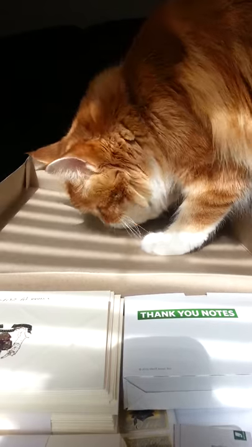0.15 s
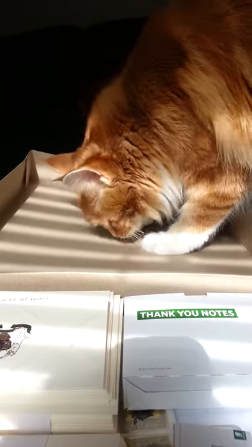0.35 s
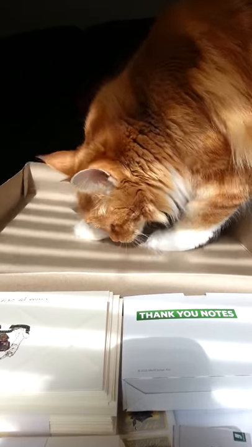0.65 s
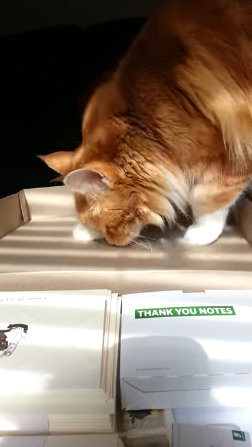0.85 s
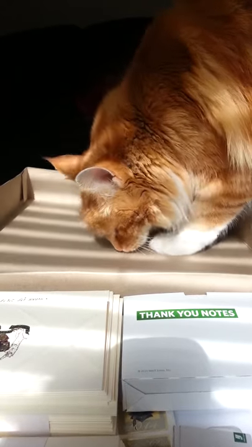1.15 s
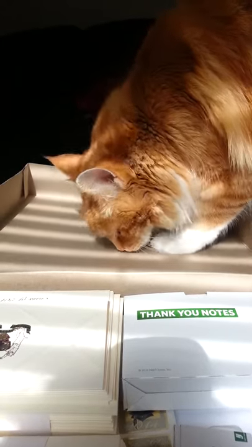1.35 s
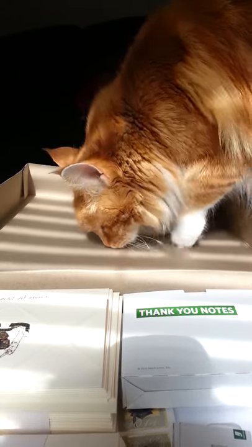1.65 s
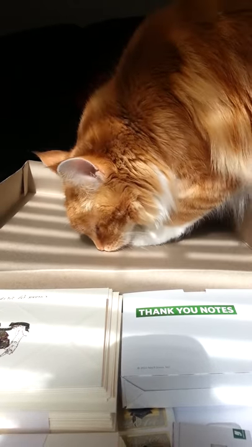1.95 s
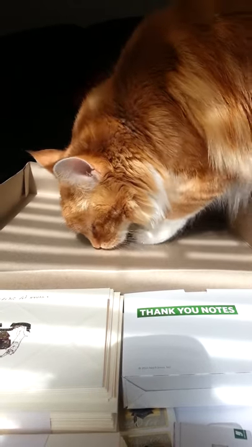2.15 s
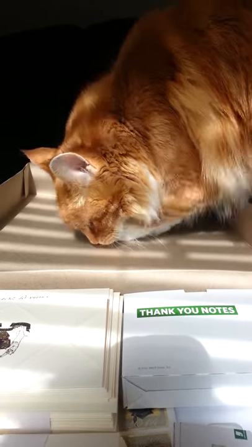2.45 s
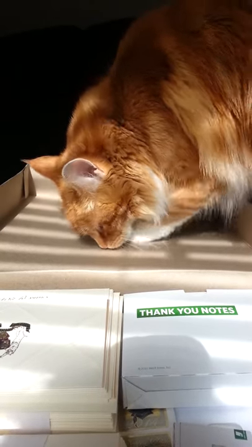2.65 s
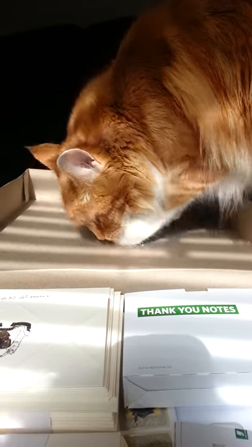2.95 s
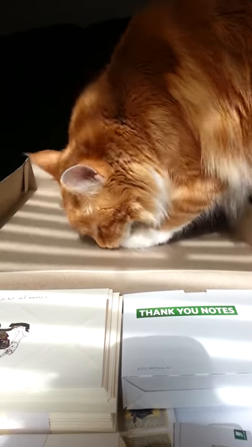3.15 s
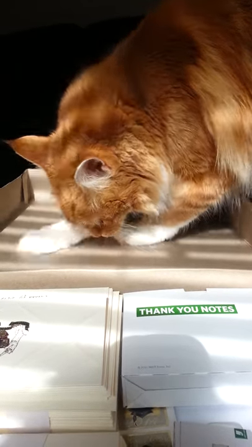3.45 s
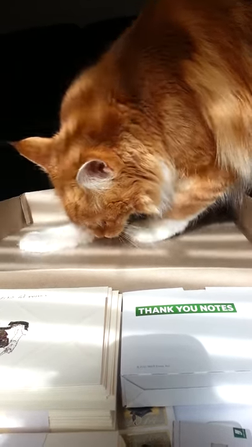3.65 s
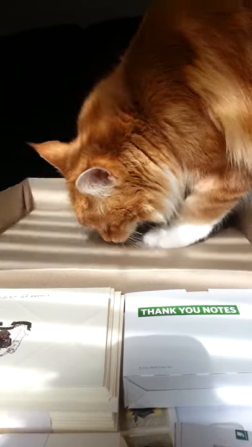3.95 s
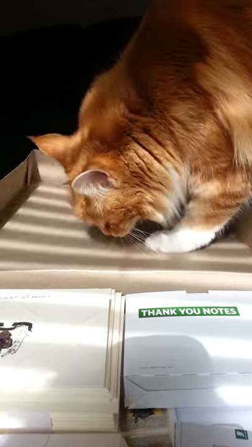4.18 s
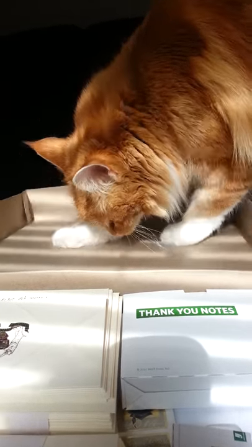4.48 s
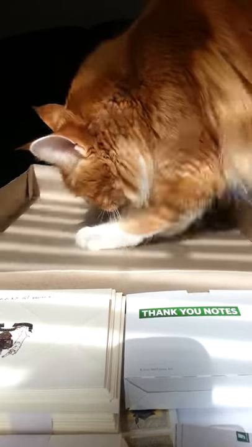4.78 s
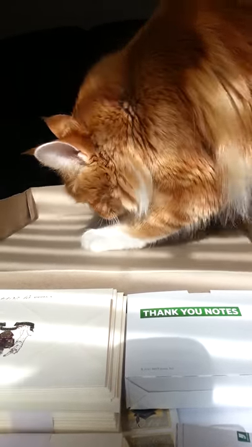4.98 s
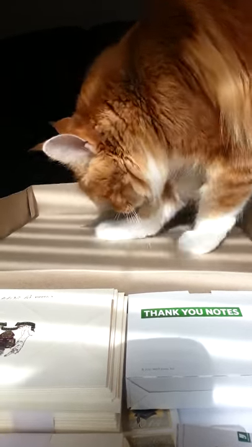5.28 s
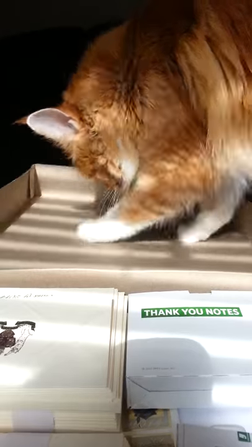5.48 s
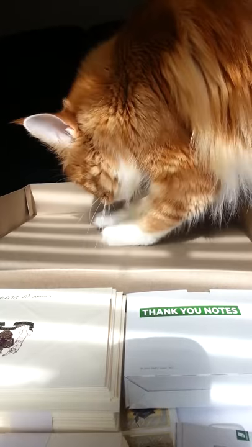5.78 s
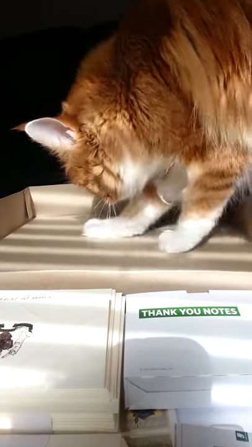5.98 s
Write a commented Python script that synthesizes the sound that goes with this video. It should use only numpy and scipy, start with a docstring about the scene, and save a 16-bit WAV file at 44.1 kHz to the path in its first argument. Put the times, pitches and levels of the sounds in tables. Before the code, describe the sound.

A cat paws at the floor of a shallow cardboard box, heard close in a quiet room with a faint, steady low hum. For the first second and a half, pads and fur make soft, dry swishes, with a small scratch and light bump near 0.7 seconds. The rubbing then thins out, and short claw rasps and ticks come at about 2 and 2.6 seconds, followed by light knocks near 2.8 and 3.5 seconds. The pawing then grows stronger, with two hollow bumps just before 4 seconds, the second the loudest. Quick scratches follow, and a claw snaps free with a sharp tick at about 4.4 seconds. Firmer sweeps continue, with another rasp and smaller bumps between 4.6 and 4.9 seconds. A sharp click and a bump land together near 5.6 seconds, and a last scraping stroke runs to about 6 seconds.

```python
"""Cat pawing in a cardboard box

Close by in a quiet room, pads and fur sweep the floor of a shallow box with a dry hiss.
Claws catch in short stick-slip rasps and snap free with sharp ticks that ring the card.
Now and then the floor gives under the cat's weight with a hollow bump. A low hum fills the room."""
import sys
import numpy as np
from scipy import signal
from scipy.fft import rfft, irfft
from scipy.io import wavfile

SR = 44100
rng = np.random.default_rng(int(sys.argv[2]) if len(sys.argv) > 2 else 0)


def int16_out(signal):
    """Quantize to a 16-bit WAV file."""
    q = np.round(np.clip(np.atleast_2d(signal).T, -1, 1) * 32767)
    wavfile.write(sys.argv[1], SR, q.astype(np.int16))


N = 269892

# Paw strokes. Each row: start in seconds, lift-off in seconds, speed as relative hiss level in dB,
# speed gain over the stroke in dB, pad pressure and claw skim as offsets to speed in dB, ring in Hz.
STROKES = [ (-0.06, 0.054, -59.5, 1, 2, -2, 3900), (0.043, 0.31, -56, -13, 2.5, 1, 4050),
           (0.437, 0.576, -55.5, 1, 1, -2, 4050), (0.58, 0.66, -67, 0.5, 8, -10, 2600),
           (0.667, 0.887, -54.5, 7.5, 4, 1, 3620), (0.972, 1.327, -55.5, -7.5, 4.5, -10, 2850),
           (1.568, 1.68, -64, -8, 4, -14, 2050), (2.05, 2.236, -67, -2, 4.5, -6, 3900),
           (2.59, 2.866, -53.5, 2.5, 2, -4, 4100), (3.03, 3.085, -59.5, 3, -1.5, -3, 3900),
           (3.147, 3.244, -53.5, 4.5, 3.5, -8, 3750), (3.454, 3.833, -56, 13, 5, -3, 3750),
           (3.826, 3.983, -43.5, -1.5, 3, -14, 3720), (3.957, 4.138, -46, 7, 2, -8, 3700),
           (4.17, 4.243, -62.5, -4, 9, -10, 2000), (4.409, 4.60, -54.5, 0, 2.5, -6, 4050),
           (4.6, 4.869, -44.5, 6.5, 2.5, -9, 2090), (5.05, 5.341, -46, -0.5, 1, -10, 2780),
           (5.364, 5.552, -43.5, 7, 2.5, -9, 3950), (5.593, 5.664, -52.5, 4, 0.5, -6, 3900),
           (5.774, 6.071, -47, -6.5, 2.5, -3.5, 2750)]
# Card panel modes. Each row: frequency in Hz, width in Hz, gain in dB.
PANEL_MODES = [(554, 390, -7), (764, 70, 0), (1173, 540, -5), (1348, 186, 6.5), (1496, 530, -2),
               (1870, 57, 2), (2018, 156, 0.5), (2270, 390, -0.5), (2584, 105, 0), (2825, 90, 3.5),
               (2950, 570, -8.5), (3520, 66, 4.5), (3560, 170, 0.5), (4350, 580, -1.5), (4570, 260, -1.5),
               (7250, 93, -12.5)]


def from_db(db):
    """Decibels to gain."""
    return 10 ** (np.asarray(db) / 20)


def rms_one(x):
    """Scale to rms 1."""
    return x / np.sqrt(np.mean(x ** 2) + 1e-20)


def seconds():
    """Time of every sample."""
    return np.arange(N) / SR


def cut(x, hz, kind, order=2):
    """Butterworth low- or high-pass."""
    return signal.sosfilt(signal.butter(order, min(hz, .45 * SR), kind, fs=SR, output="sos"), x + 1e-18)


def drift(hz):
    """Slow random wander; rms 1."""
    return rms_one(cut(rng.standard_normal(N + SR), hz, "low")[SR:])


def colour(x, spectrum):
    """Filter by a curve of (Hz, dB) points; rms 1."""
    hz, db = np.transpose(spectrum)
    bins_hz = np.maximum(np.arange(N // 2 + 1) * SR / N, 1)
    gain = from_db(np.interp(np.log(bins_hz), np.log(hz), db))
    return rms_one(irfft(rfft(x) * gain, N))


def resonate(x, hz, width_hz):
    """One resonance, peak gain 1."""
    r = np.exp(-np.pi * width_hz / SR)
    feedback = [1, -2 * r * np.cos(2 * np.pi * hz / SR), r * r]
    return signal.lfilter(np.array([1, 0, -1]) * (1 - r * r) / 2, feedback, x + 1e-18)


def body(x, modes):
    """Parallel resonances of alternating sign."""
    return sum((-1) ** k * from_db(db) * resonate(x, hz, width_hz)
               for k, (hz, width_hz, db) in enumerate(modes))


def add(out, start_s, piece):
    """Mix a piece in at start_s."""
    at = max(round(start_s * SR), 0)
    out[at:at + len(piece)] += piece[:max(N - at, 0)]


def background(hum_hz=122.1, hum_db=-63.5, drone_db=-60.5, air_db=-54.5):
    """Still room air, mains hum and a soft, wavering drone."""
    # Each row: frequency in Hz, relative noise density in dB.
    air_spectrum = [(20, -15), (32, -17), (52, -11.5), (90, -1.5), (160, -1.5), (250, -0.5), (400, -3.5),
                    (650, -8.5), (1000, -17), (1600, -13.5), (3500, -18.5), (6200, -25), (8000, -22),
                    (14500, -21)]
    hum_gain = from_db(hum_db + 2.9 * drift(hz=1.8))
    hum_phase = 2 * np.pi * hum_hz * seconds() + .5 * drift(hz=2.8)
    hum = hum_gain * rms_one(np.sin(hum_phase))
    drone = rms_one(resonate(rng.standard_normal(N + SR), hz=195.7, width_hz=9.5)[SR:])
    air = colour(rng.standard_normal(N), air_spectrum)
    return from_db(air_db) * air + hum + from_db(drone_db) * drone


def room(x, t60_s=0.16, tail_db=-17, lowpass_hz=4800):
    """Add a short, dull, diffuse tail."""
    t = np.arange(SR // 2) / SR
    decay = from_db(-60 * t / t60_s) * (t > .006)
    tail = cut(rng.standard_normal(len(t)), lowpass_hz, "low") * decay
    tail /= np.sqrt(np.sum(tail ** 2))
    return x + from_db(tail_db) * signal.fftconvolve(x, tail)[:N]


def box_walls(x):
    """Add very early echoes off the upright sides."""
    # Each row: delay in seconds, gain in dB.
    echoes = [(.0017, -31), (.0031, -35.5), (.0068, -33)]
    out = x.copy()
    for delay_s, db in echoes:
        add(out, delay_s, from_db(db) * x)
    return out


def floor_bumps(rebound_s=0.01358, pitch_ratio=1.336, rise_cycles=0.59):
    """The floor gives, rebounds twice, each time higher and weaker, and leaves the box ringing."""
    # Each row: start in seconds, level in dB, pitch in Hz, first rebound gain in dB.
    bumps = [ (0.731, -40.5, 392, -11), (2.829, -37, 500, -18), (3.5097, -36.5, 310, -10),
             (3.861, -26.5, 242, -6.5), (3.966, -20, 230, -4.5), (4.627, -39, 187, -12),
             (4.846, -32, 213, -6.5), (5.563, -31.5, 403, -2), (5.572, -34, 171, -12)]
    # Whole-box modes. Each row: frequency in Hz, width in Hz, gain in dB.
    box_modes = [(118, 11, -3), (199, 10, -15), (229, 2.6, -4.5), (295, 8.2, -11), (344, 24, 3.5)]
    out, t = np.zeros(N), np.arange(SR // 10) / SR
    for start_s, level_db, first_hz, rebound_db in bumps:
        for k in range(3):
            hz = first_hz * pitch_ratio ** k
            swell = t * hz / rise_cycles
            envelope = from_db(level_db + rebound_db * k ** 2) * swell * np.exp(1 - swell)
            add(out, start_s + k * rebound_s, envelope * np.sin(2 * np.pi * hz * t))
    return out + body(out, box_modes)


def slips(samples, per_s, spread_db):
    """Tiny, uneven stick-slip releases over paper fibres; rms 1."""
    signs = rng.choice([-1, 1], samples)
    sizes = from_db(spread_db * np.clip(rng.standard_normal(samples), -2, 2))
    return rms_one(signs * sizes * (rng.random(samples) < per_s / SR))


def held(start_s, end_s, attack_s, release_s):
    """Envelope: linear rise, hold, exponential release."""
    t = seconds()
    return np.clip((t - start_s) / attack_s, 0, 1) * np.exp(-np.maximum(t - end_s, 0) / release_s)


def progress(start_s, lift_s):
    """Stroke position: -1/2 at landing, 1/2 at lift-off."""
    return np.clip((seconds() - start_s) / (lift_s - start_s), 0, 1) - .5


def paw_speed(start_s, lift_s, swell_db, arch_db=0.5):
    """Speed as a gain: a paw lands, speeds up or slows, with a slight mid-stroke arch, and lifts."""
    travel = progress(start_s, lift_s)
    contact = held(start_s, lift_s, attack_s=0.079, release_s=0.031)
    return contact * from_db(swell_db * travel + arch_db * np.cos(2 * np.pi * travel))


def paw_levels_db(resting_db=-67, swell_share=0.25, ease_db=0.5):
    """Envelopes of fur, following speed, and pads, following pressure; the cat is never quite still."""
    fur_power = pad_power = from_db(resting_db) ** 2
    for start_s, lift_s, speed_db, swell_db, pressure_db, _, _ in STROKES:
        rub_db = speed_db + pressure_db + (swell_share * swell_db - ease_db) * progress(start_s, lift_s)
        press = held(start_s, lift_s, attack_s=0.041, release_s=0.043)
        fur_power = fur_power + (from_db(speed_db) * paw_speed(start_s, lift_s, swell_db)) ** 2
        pad_power = pad_power + (from_db(rub_db) * press) ** 2
    return 10 * np.log10([fur_power, pad_power])


def paw_strokes():
    """Fur hisses with speed; pressing pads drag, shake the panel and make the box rumble."""
    # Friction and rumble spectra. Each row: frequency in Hz, gain in dB.
    fur_spectrum = [(1000, -33), (2500, -7.5), (4500, 0), (6000, -1.5), (7100, 2.5), (10000, 0),
                    (14500, -2.5)]
    pad_spectrum = [(300, -31), (700, -6), (1100, -4.5), (1600, 2), (2600, 1), (3200, 2.5), (3900, 1),
                    (4700, -2), (5600, -5.5), (9000, -41)]
    rumble_spectrum = [(40, -35), (110, -15), (230, 2), (380, 2), (650, -3), (950, 0), (1500, -9),
                       (4000, -20.5)]
    fur_db, pad_db = paw_levels_db()
    fur = colour(rng.standard_normal(N), fur_spectrum) * from_db(fur_db + 3.0)
    drag = slips(N, per_s=6000, spread_db=4.0)
    # The travelling paw feeds each mode unevenly.
    panel = sum((-1) ** k * body(drag, [mode]) * from_db(5 * np.tanh(drift(hz=6)))
                for k, mode in enumerate(PANEL_MODES))
    rub = slips(N, per_s=5700, spread_db=5.5)
    pads = colour(rub + 1.04 * panel, pad_spectrum) * from_db(pad_db - 1.3)
    # Rumble grows only slowly with pressure.
    rumble = colour(rng.standard_normal(N), rumble_spectrum) * from_db(0.39 * pad_db - 34.5)
    return fur + pads + rumble


def claw_skims(width_hz=490, overtone_ratio=2.04, overtone_db=-9, speed_exponent=1.9):
    """Near a stroke's top speed, skimming claw tips make the patch under them sing."""
    out, force = np.zeros(N), slips(N, per_s=3000, spread_db=3.5)
    for start_s, lift_s, speed_db, swell_db, _, skim_db, hz in STROKES:
        speed = paw_speed(start_s, lift_s, swell_db)
        envelope = speed.max() * (speed / speed.max()) ** speed_exponent
        ring = body(force, [(hz, width_hz, 0), (overtone_ratio * hz, width_hz, overtone_db)])
        out += from_db(speed_db + skim_db) * envelope * rms_one(ring)
    return out


def card(force, spot_hz, spot_db, spot_q):
    """Panel modes plus the ring of the spot under the claw."""
    return body(force, PANEL_MODES) + from_db(spot_db) * resonate(force, spot_hz, spot_hz / spot_q)


def claw_rasps(dig_share=.42):
    """A claw digs in, judders across the fibres and lets go."""
    # Each row: start in seconds, length in seconds, level in dB, spot ring in Hz,
    # ring gain in dB, tearing grit gain in dB.
    rasps = [ (0.668, 0.093, -50, 810, 19, -23), (1.008, .054, -45, 1440, 8, -22),
             (1.613, .038, -42, 1980, 3, -16), (2.014, 0.045, -40, 800, 6, -9.5),
             (2.086, 0.0038, -45.5, 3500, -6, -15), (2.56, 0.053, -34, 1940, 8.5, -24),
             (3.203, 0.028, -37, 2140, 11, -30), (3.895, .014, -30.5, 3060, -1.5, -23),
             (4.097, .014, -29.5, 2180, 10, -13), (4.137, 0.021, -26, 3800, 5, -13),
             (4.362, 0.0055, -29, 1620, -1, -36), (4.3687, .007, -28, 1730, 1, -43),
             (4.663, 0.022, -31, 2620, 4.5, -30), (5.824, 0.029, -42.5, 2980, 16, -18)]
    out, t = np.zeros(N), np.arange(SR // 4) / SR - 0.1  # grip peaks at t = 0
    for start_s, length_s, level_db, spot_hz, spot_db, grit_db in rasps:
        rise_s, fall_s = dig_share * length_s, (1 - dig_share) * length_s
        # Slips clump a few milliseconds apart.
        judder = rms_one(cut(rng.standard_normal(len(t)), 200, "low"))
        force = from_db(3 * np.tanh(judder)) * slips(len(t), per_s=5200, spread_db=8.0)
        grip = np.exp(-np.where(t < 0, (t / rise_s) ** 4, (t / fall_s) ** 2))
        ring = rms_one(card(force, spot_hz, spot_db, spot_q=4))
        grit = from_db(grit_db) * rms_one(resonate(force, hz=5200, width_hz=5400))
        rasp = np.std(grip) * rms_one(grip * (ring + grit))
        add(out, start_s + rise_s + t[0], from_db(level_db) * rasp)
    return out


def claw_snaps(crackle_decay_s=0.0061):
    """A claw flicks off the card: one sharp blow, then a brief crackle of fibres."""
    # Each row: start in seconds, level over the first 4 ms in dB, spot ring in Hz, ring gain in dB,
    # contact hardness as low-pass in Hz, crackle gain in dB.
    snaps = [ (2.0254, -40, 2600, 2, 8000, -16), (2.5778, -34, 1990, 7, 5000, -17),
             (2.819, -41.5, 650, 2, 2200, -25), (2.8314, -38, 510, 22, 2500, -25),
             (3.4989, -27.5, 1470, 12, 3530, -26), (4.3551, -22, 1630, 11, 2360, -21.5),
             (4.625, -40, 2360, 15, 6000, -24), (5.5626, -24, 2960, 10, 8000, -25),
             (5.5635, -27.5, 1250, -1, 7000, -18)]
    out, t = np.zeros(N), np.arange(SR // 10) / SR
    for start_s, level_db, spot_hz, spot_db, contact_hz, crackle_db in snaps:
        crackle = slips(len(t), per_s=5000, spread_db=4)
        force = from_db(crackle_db) * crackle * np.exp(-t / crackle_decay_s)
        force[0] = 1  # the blow
        tick = cut(card(force, spot_hz, spot_db, spot_q=3), contact_hz, "low")
        add(out, start_s, from_db(level_db) * tick / np.std(tick[:SR // 250]))
    return out


def scene():
    """Cat and box in the room, alike in both ears."""
    pawing = paw_strokes() + claw_rasps() + claw_snaps() + claw_skims()
    mono = room(box_walls(pawing) + floor_bumps()) + background()
    return np.array([mono, mono])


def record(dry):
    """Steep elliptic low-pass."""
    cutoff_hz = 14600
    return signal.sosfilt(signal.ellip(12, .1, 80, cutoff_hz, fs=SR, output="sos"), dry)


dry = scene()
out = record(dry)
int16_out(out)
```